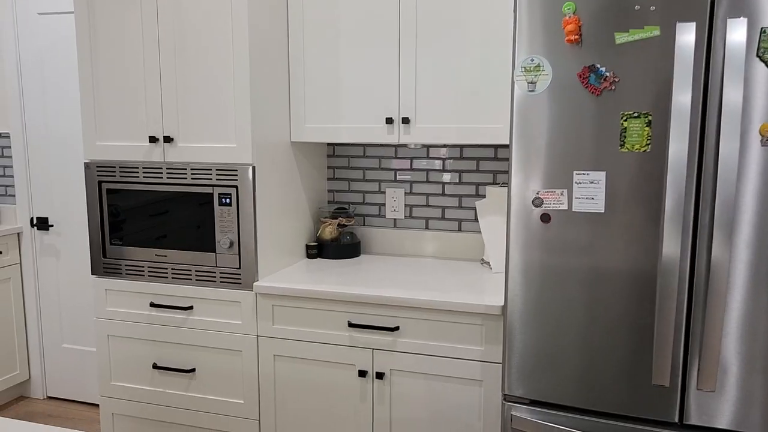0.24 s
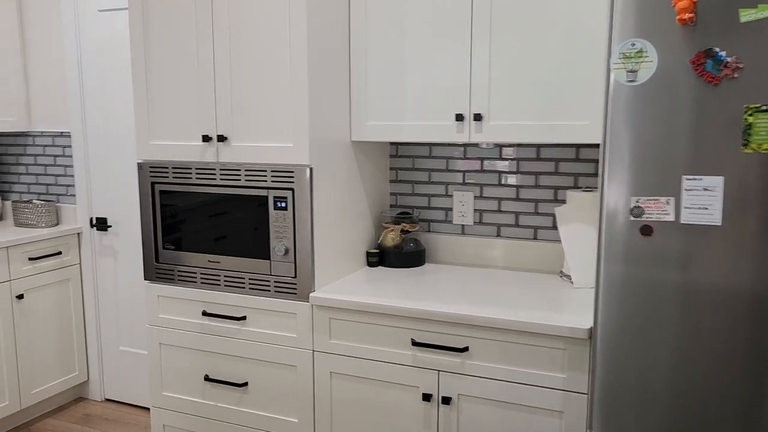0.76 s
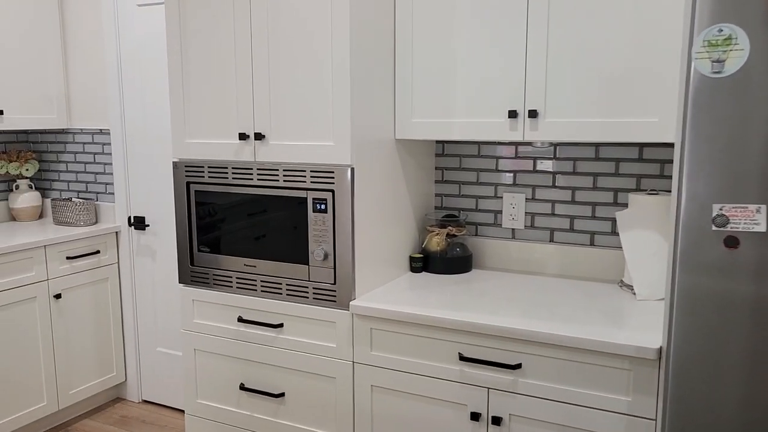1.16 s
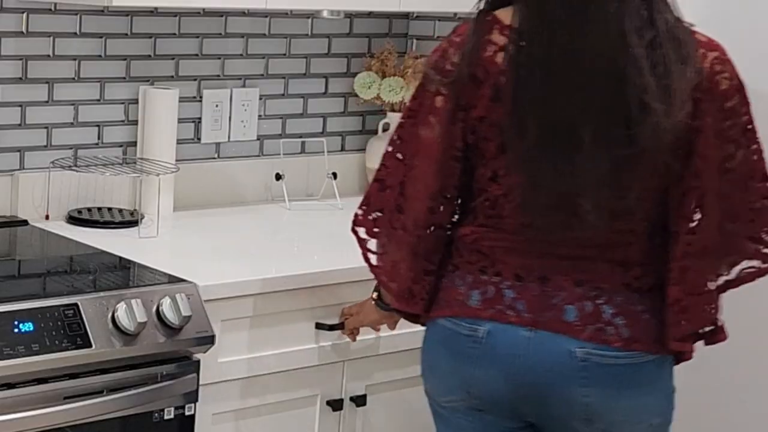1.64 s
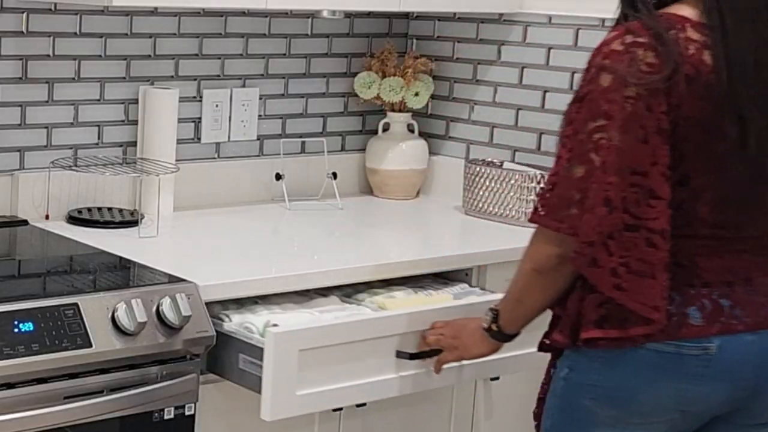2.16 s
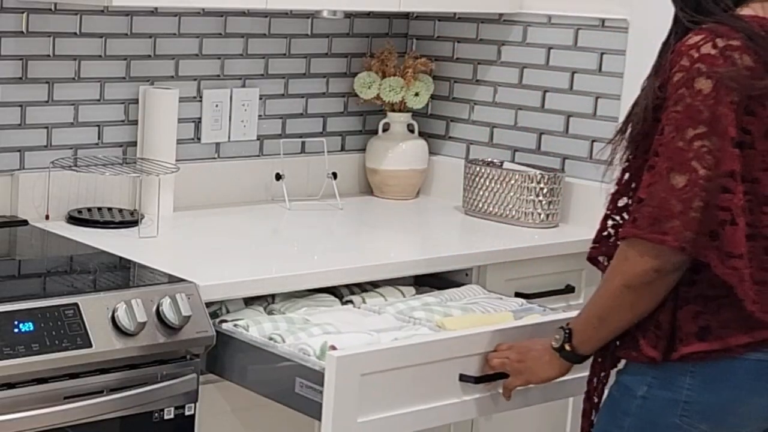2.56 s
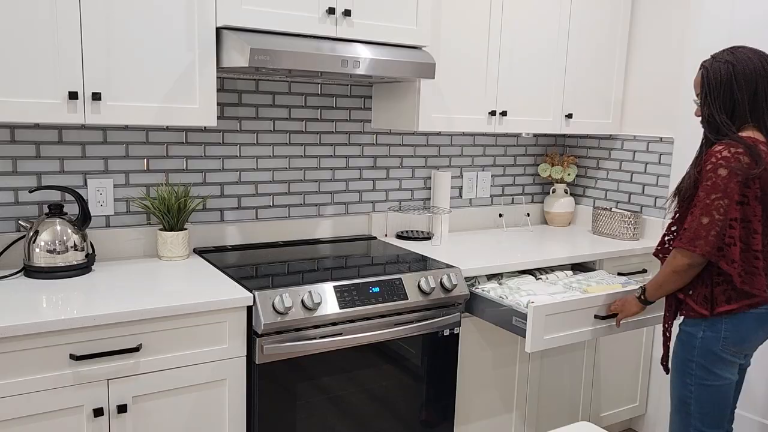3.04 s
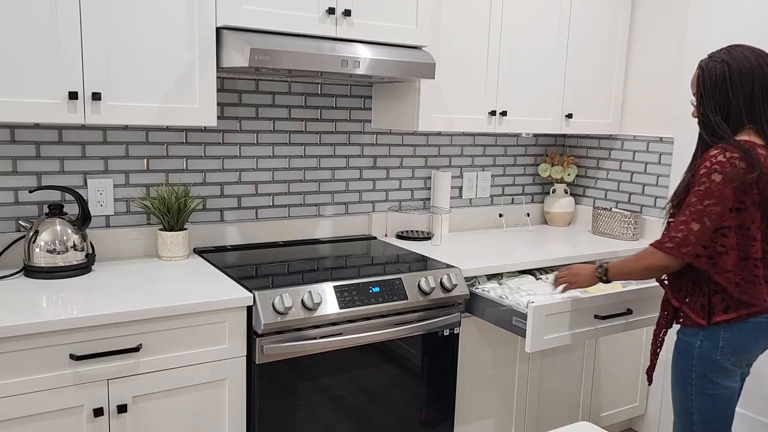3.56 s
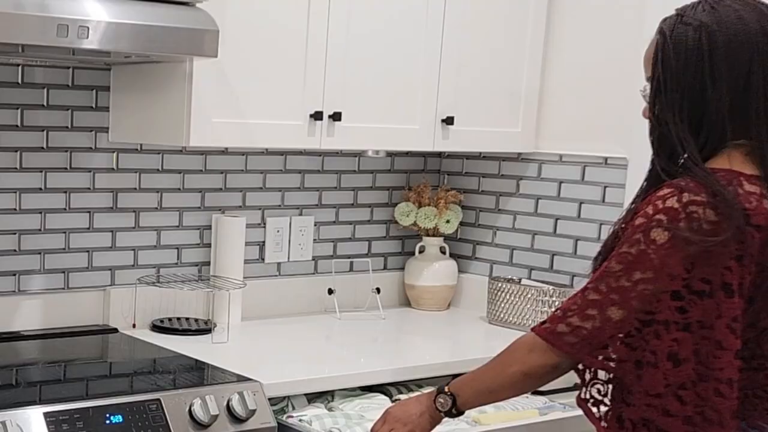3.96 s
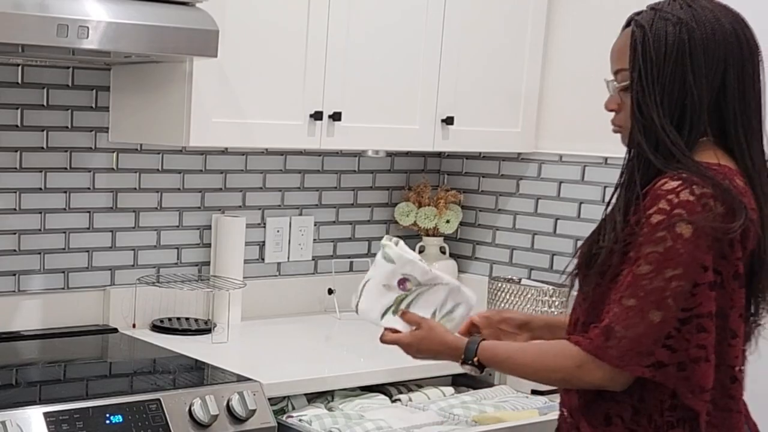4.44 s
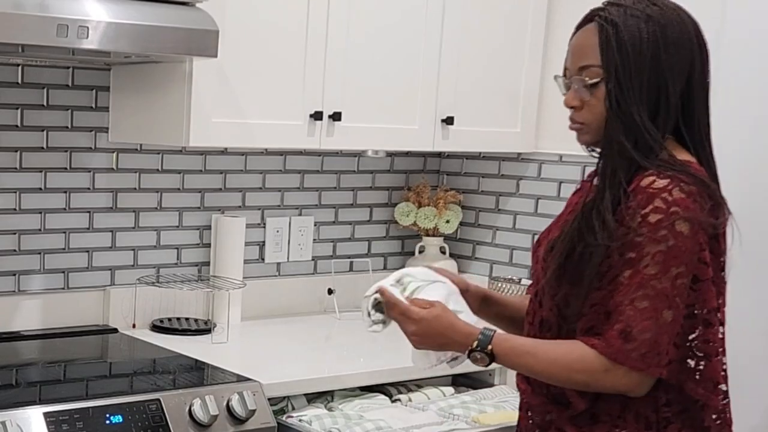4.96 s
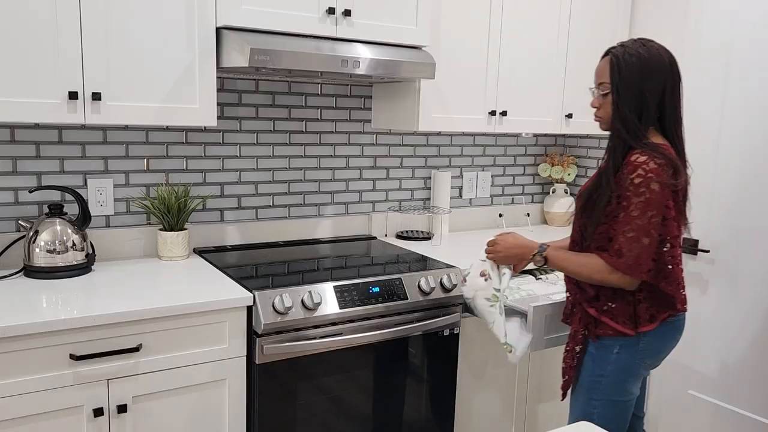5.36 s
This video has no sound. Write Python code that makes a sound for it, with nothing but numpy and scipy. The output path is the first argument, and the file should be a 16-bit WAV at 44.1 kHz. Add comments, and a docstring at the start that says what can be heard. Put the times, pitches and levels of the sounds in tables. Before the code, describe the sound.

In a hard-walled kitchen, a loud wooden thump is followed by a drawer sliding open with a boxy knock, then faint towel swishes.

```python
"""A hard-walled kitchen, heard from a few steps away, built from shaped noise and decaying modes.
Over refrigerator hum and fan air, a cabinet slides, judders, catches and thuds shut; its panels ring.
The hum then gives way to quiet room tone. A drawer rasps off its catch, rolls out on ball bearings,
bangs into its end stop with a boxy ring and rattling rails, and clacks as the hand lets go.
A towel is pulled out and shaken open: bands of grainy noise glide in pitch under fibre hiss."""
import sys
import numpy as np
from scipy import signal
from scipy.fft import rfft, irfft, next_fast_len
from scipy.io import wavfile
from scipy.ndimage import uniform_filter1d

SR = 44100
rng = np.random.default_rng(int(sys.argv[2]) if len(sys.argv) > 2 else 0)


def bounce(signal):
    """Save signal as a 16-bit WAV file at the path given by the first command-line argument."""
    frames = np.transpose(np.atleast_2d(signal))
    limited = np.clip(frames, -1, 1)
    pcm = np.round(limited * 32767).astype(np.int16)
    wavfile.write(sys.argv[1], SR, pcm)


N = 247070
TIME = np.arange(N) / SR
RING_TIME = np.arange(SR) / SR  # every blow is given one second to die away

# Cabinet contacts; hard ones clatter, soft ones thump the panels:
# (time [s], level before the hard/soft split [dB], hardness [0-1])
CABINET_KNOCKS = [(.782, -25, 0.9), (.792, -27, 0.94), (.803, -16.5, 0.07), (.817, -14.5, 0.24),
                  (.879, -26.5, 0.28)]
# Cabinet panel modes: (frequency [Hz], level [dB])
PANEL_MODES = [(60, 4), (102, 4), (122, -0.5), (187, 2), (213, -6), (334, -2.5), (377, 0)]
# Cabinet frame modes, rung by hard contacts: (frequency [Hz], level [dB])
FRAME_MODES = [(614, 2.5), (870, 0.5), (1020, -6), (1163, -11.5)]
# Colour of the cabinet's clatter: (frequency [Hz], gain [dB])
CABINET_WOOD = [(70, -36), (112, -5), (159, -22), (206, -10.5), (266, -17), (376, -17.5), (627, -16),
                (1020, -19), (1290, -26.5), (1670, -24.5), (2900, -37), (4200, -46), (15500, -71)]
# Resonances of the juddering wood, each passed twice: (frequency [Hz], width of one pass [Hz], level [dB])
JUDDER_BODY = [(130, 90, 2), (380, 73, 2), (620, 180, -7)]
# Drawer jolts:
# (time [s], clatter level [dB], brightness [dB/octave], box ring level [dB], rocking level [dB])
DRAWER_KNOCKS = [(2.666, -53.5, -9, -46, -52), (2.781, -29, 1.5, -22.5, -20.5), (3.08, -58.5, 1, -62, -64),
                 (3.517, -49.5, -6, -38.5, -35.5)]
# Drawer box modes: (frequency [Hz], level before brightness [dB])
BOX_MODES = [(97, -1), (126, 3), (184, -1), (226, -1.5), (356, 0.5), (382, 0), (415, 0), (463, -5),
             (552, -2), (651, -0.5), (698, -1.5), (764, -9.5)]
# The drawer's weight rocking on its slides: (frequency [Hz], level [dB], t60 [s])
ROCKING_MODES = [(27.7, -4.5, 0.96), (43.56, -4, 1), (53.6, -0.5, 0.63)]
# Colour of the drawer's clatter: (frequency [Hz], gain [dB])
DRAWER_WOOD = [(53, -11), (90, 5), (172, -7.5), (222, -6.5), (259, -10.5), (415, 1.5), (515, -5.5),
               (682, -3.5), (1120, -14.5), (1690, -16.5), (2710, -26), (5390, -25.5), (8120, -34),
               (12200, -34.5), (15500, -41)]
# Clacks of the steel slides: (time [s], level [dB], brightness [dB/octave])
CLACKS = [(2.787, -39.5, 9.5), (2.798, -36, -3), (3.088, -55, -4.5), (3.2, -56.5, -7), (3.488, -38, -0.5),
          (3.496, -33, 0), (3.524, -39.5, -5.5)]
# Slide rail modes: (frequency [Hz], level before brightness [dB])
RAIL_MODES = [(625, -1.5), (705, 1.5), (1385, 2), (1810, 2), (2216, 4), (2495, 4), (3128, -1)]
# Colour of the slides' rattle: (frequency [Hz], gain [dB])
SLIDE_STEEL = [(300, -11), (700, -6), (1400, -2), (2800, 0), (4500, -8), (7500, -20), (10000, -34),
               (15500, -61)]
# Resonances of the catch, each passed twice: (frequency [Hz], width of one pass [Hz], gain of one pass [dB])
CATCH_BODY = [(1510, 500, -0.61), (2660, 780, 0.5), (4680, 600, 0.71)]
# Drawer resonances shaken by the rolling: (frequency [Hz], width [Hz], gain [dB])
ROLL_BODY = [(294, 33, 3.5), (385, 47, 3), (472, 71, 1), (563, 135, -0.5), (710, 85, 3), (924, 355, -7),
             (1390, 850, -13), (2250, 650, -20.5)]
# Rough spots in the rails: (time [s], jolt against the steady rolling [dB])
ROLL_BUMPS = [(2.044, 1), (2.12, 0), (2.237, 0)]
# Carcass resonance, passed twice: (frequency [Hz], width of one pass [Hz], gain of one pass [dB])
CARCASS_BODY = [(107, 135, 0)]
# Towel swishes; a narrow one squeaks:
# (time [s], length [s], level [dB], starting pitch [Hz], ending pitch [Hz], half-width [octaves])
SWISHES = [(3.761, 0.053, -62, 850, 1100, 1), (3.905, 0.034, -56, 424, 450, 0.24),
           (4.249, 0.06, -58.5, 900, 1000, 1), (4.522, 0.19, -52, 826, 2910, 0.46),
           (4.928, 0.063, -62, 1220, 1250, .1), (5.356, 0.037, -61, 500, 480, 0.88)]
# Small hardware clicks: (time [s], level [dB])
CLICKS = [(.585, -42.5), (0.603, -39.5), (1.592, -45)]
# Plucks of the catch spring: (time [s], level in the left channel [dB])
TWANGS = [(.64, -51), (0.85, -46)]
# Catch spring modes: (frequency [Hz], level [dB])
SPRING_MODES = [(2186, 0), (6848, -5)]
# Colour of small hardware: (frequency [Hz], gain [dB])
HARDWARE_COLOUR = [(200, 5.5), (700, -2.5), (1800, -1), (3500, -7.5), (6000, -11), (10000, -18),
                   (15500, -19)]
# Short rubs of slides and sleeve: (time [s], length [s], level [dB], brightness [about dB/octave])
RUBS = [(0.462, 0.089, -51, -4), (0.614, 0.052, -45, -3.5), (0.716, 0.065, -42.5, -6.5),
        (0.804, 0.072, -40.5, -4.5), (0.811, 0.026, -55, 6), (1.586, 0.067, -52.5, -3),
        (1.756, 0.038, -42, -1), (1.875, 0.059, -42.5, -5.5), (3.231, 0.031, -51.5, 12.5),
        (3.278, 0.28, -63, 10), (4.248, 0.058, -60.5, 8), (4.911, 0.079, -60, 1.5)]
# Colour of rubbing: (frequency [Hz], gain [dB])
RUB_COLOUR = [(300, -0.5), (1200, 1), (2400, 2.5), (3500, -2.5), (5300, -1.5), (7500, -7), (10000, -11),
              (15500, -13.5)]
# Compressor and fan tones: (frequency [Hz], rms level [dB])
FRIDGE_HUM = [(59.2, -45.5), (107.7, -55.5), (296, -64.5), (360.6, -58), (539, -61), (651.2, -60.5)]
# Colour of the fan air: (frequency [Hz], gain [dB])
FRIDGE_AIR = [(25, -16.5), (57, -5.5), (80, -15), (112, -19.5), (175, -22), (289, -19.5), (322, -38),
              (359, -19.5), (582, -22.5), (700, -23), (1500, -41), (15500, -64)]
# Colour of the quiet room: (frequency [Hz], gain [dB])
ROOM_TONE = [(20, -2), (88, 2), (125, -8), (160, -13.5), (230, -11.5), (290, -18.5), (700, -20),
             (2000, -25), (8600, -33.5), (10500, -42), (15500, -37)]
# Reverberation of the kitchen: (frequency [Hz], t60 [s])
KITCHEN = [(100, 0.95), (400, 0.5), (1500, 0.52), (4000, 0.48), (8000, 0.43), (15000, 0.41)]
# Likeness of the two channels in diffuse sound: (frequency [Hz], correlation [0-1])
ALIKE = [(110, 0.94), (290, 0.84), (640, 0.45), (1400, 0.0039)]
# Channel balance: (frequency [Hz], left minus right [dB])
BALANCE = [(60, 0), (700, 1.54), (8000, 2.5), (13000, -2.5)]

# the cabinet gathers speed until it meets its frame
PUSH_S, SHUT_S, GLIDE_DB, GLIDE_GAIN_DB = 0.61, 0.78, -29.5, 13.5
SOFT_TILT_DB, HARD_TILT_DB = -6, -1  # brightness per octave of the softest and the hardest contact
# the cabinet judders as it nears the frame: starting slip rate, its climb and relative jitter
JUDDER_S, JUDDER_LENGTH_S, JUDDER_DB = .69, 0.0986, -29
JUDDER_HZ, JUDDER_OCTAVES_PER_S, JUDDER_JITTER = 116.7, 2.57, .06
# every drawer jolt bounces on: first gap, growth of the gaps, loss of level and of tilt per contact
BOUNCE_S, BOUNCE_GROWTH, BOUNCE_LOSS_DB, BOUNCE_DULL_DB = .021, 1.24, 1, 1.8
LEAD_S, LEAD_DB = 0.0085, -9  # the slides' play is taken up just before the blow
CATCH_S, CATCH_LENGTH_S, CATCH_DB = 1.685, 0.16, -52  # the catch drags before it lets go
# the drawer is pulled: it speeds up, then slows steadily until it stops
PULL_S, FASTEST_S, STOP_S = 1.91, 2.13, 2.815
ROLL_DB, ROLL_GAIN_DB, ROLL_LOSS_DB = -39.5, 6, 12.5  # level; speed gained on the way up; lost by the stop
RAIL_HISS_DB, CARCASS_DB = -60, -52  # rail hiss at full speed; carcass rumble while the drawer moves
BUMP_S, ROLL_BRIGHTENS = .008, .5  # decay of a jolt; how much more the high resonances depend on speed
CLOTH_GRIT_DB = 0.5  # cloth slides more smoothly than hardware
FIBRE_DB, FIBRE_GROWTH_DB = -8, 3.5  # hiss against a swish centred on 1 kHz; more per octave of pitch
# the towel rustles in small touches while it is handled
HANDLING_S, HANDLING_LENGTH_S, HANDLING_DB = 4.9, 1, -68.5
TOUCH_S, TOUCH_SPREAD_DB = .035, 3
MOVE_S = 1.59  # the listening place jumps from refrigerator to stove: only the background switches
TOP_HZ = 15800


def cabinet():
    """The cabinet rumbles home ever faster, knocks on its frame and thumps its panels."""
    out = np.zeros((2, N))
    for s, db, hardness in CABINET_KNOCKS:
        hard = np.clip(hardness, 0, 1)
        tilt_db = SOFT_TILT_DB + hard * (HARD_TILT_DB - SOFT_TILT_DB)
        knock = clatter(CABINET_WOOD, tilt_db, rise_s=0.00049, early=3.1, early_s=0.0038)
        frame = ring(FRAME_MODES, rise_s=0.0014, scatter_db=2.0, wander=3.3)
        thump = ring(PANEL_MODES, rise_s=0.0019, scatter_db=3.0, wander=6.6, damping=2.4)
        add(out, s, amp(db) * hard * knock)
        add(out, s, amp(db - 14.5) * hard * frame)
        add(out, s, amp(db) * (1 - hard) * thump)
    panels = [(hz, hz / 3, db) for hz, db in PANEL_MODES]
    rumble = unit(filtered(rng.standard_normal(N), lambda f: f * resonances(panels, f)))
    glide = amp(GLIDE_DB) * motion(PUSH_S, SHUT_S, SHUT_S, GLIDE_GAIN_DB, 0)
    muffled = filtered(glide * rumble, lambda f: 1 / (1 + (f / 800) ** 2))
    return out + in_kitchen(muffled, direct=0.58)


def judder():
    """Wood sticks and slips unevenly, ever faster and harder: a short rough groan just before the thud."""
    t = TIME[:round(JUDDER_LENGTH_S * SR)]
    jitter = JUDDER_JITTER * unit(uniform_filter1d(rng.standard_normal(len(t)), size=300))
    rate = JUDDER_HZ * 2 ** (JUDDER_OCTAVES_PER_S * t) * (1 + jitter)
    # one impulse for each completed cycle, of uneven strength
    slips = np.diff(np.floor(np.cumsum(rate) / SR), prepend=-1) * amp(3 * rng.standard_normal(len(t)))
    swelling = slips * (1 + 2 * t / JUDDER_LENGTH_S)

    def wood(f):
        return sum(amp(db) * resonances([(hz, w, 0)], f) ** 2 for hz, w, db in JUDDER_BODY)

    groan = unit(filtered(swelling, wood))
    fade = np.minimum(1, 10 * (1 - t / t[-1]))  # over the last tenth
    out = np.zeros((1, N))
    add(out, JUDDER_S, amp(JUDDER_DB) * groan * fade)
    return in_kitchen(out[0], direct=2.2)


def drawer_knocks():
    """Each jolt ticks, strikes and bounces: the box rings and its weight rocks on the extended slides."""
    out = np.zeros((2, N))

    def wood(tilt_db):
        return clatter(DRAWER_WOOD, tilt_db, rise_s=0.0025, early=1.0, early_s=0.058)

    for s, db, tilt_db, ring_db, rock_db in DRAWER_KNOCKS:
        add(out, s - LEAD_S, amp(db + LEAD_DB) * wood(tilt_db))
        add(out, s, amp(rock_db) * ring(ROCKING_MODES, rise_s=0.012, scatter_db=4, wander=1.7))
        modes = tilted(BOX_MODES, tilt_db / 2)
        for k, delay_s in enumerate(bounces(count=3)):
            box = amp(ring_db) * ring(modes, rise_s=0.005, scatter_db=0.0, wander=5.0, damping=2.04)
            strike = amp(db) * wood(tilt_db - k * BOUNCE_DULL_DB)
            add(out, s + delay_s, amp(-k * BOUNCE_LOSS_DB) * (strike + box))
    return out


def bounces(count):
    """Delays of the contacts of one jolt, each gap longer than the last."""
    gaps = BOUNCE_S * BOUNCE_GROWTH ** np.arange(count)
    return np.cumsum(gaps) - gaps


def slides():
    """The steel rails rattle in their play and ring briefly."""
    out = np.zeros((2, N))
    fade = np.exp(-(RING_TIME / 0.25) ** 2)  # the rattle settles as the parts come to rest
    for s, db, tilt_db in CLACKS:
        rattle = fade * clatter(SLIDE_STEEL, tilt_db, rise_s=0.0014, early=0.62, early_s=0.0029)
        modes = tilted(RAIL_MODES, tilt_db)
        rails = amp(-7.5) * ring(modes, rise_s=0.0012, scatter_db=3.0, wander=7.8, damping=1.44)
        add(out, s, amp(db) * (rattle + rails))
    return out


def drawer_run():
    """The catch rasps, then ball bearings roll, shake drawer box and carcass, and hiss along the rails."""
    catch = np.zeros((1, N))
    drag = stroke(CATCH_LENGTH_S)
    rasp = unit(filtered(drag, lambda f: sum(resonances([mode], f) ** 2 for mode in CATCH_BODY)))
    add(catch, CATCH_S, amp(CATCH_DB) * rasp)
    speed = motion(PULL_S, FASTEST_S, STOP_S, ROLL_GAIN_DB, ROLL_LOSS_DB)
    hiss = rub_colour(grit(N, spread_db=0.5, grain_s=0.0029), tilt_db=0.0)
    rumble = unit(filtered(rng.standard_normal(N), lambda f: resonances(CARCASS_BODY, f) ** 2))
    run = amp(ROLL_DB) * rolling(speed)
    run = run + amp(RAIL_HISS_DB) * speed * hiss
    run = run + amp(CARCASS_DB) * (speed > 0) * rumble
    return in_kitchen(catch[0] + run, direct=0.65)


def rolling(speed):
    """Bearings shake the drawer box; its resonances trade strength, the high ones fading first as it slows."""
    jolts = sum(amp(db) * np.exp(-np.abs(TIME - s) / BUMP_S) * (TIME >= s) for s, db in ROLL_BUMPS)
    drive = grit(N, spread_db=4.5, grain_s=.004) * (1 + jolts)

    def each_resonance(f):
        return np.array([(-1) ** k * resonances([mode], f) for k, mode in enumerate(ROLL_BODY)])

    parts = filtered(drive, each_resonance)
    shift = amp(2 * unit(uniform_filter1d(rng.standard_normal(parts.shape), size=3000)))
    hz = np.array(ROLL_BODY)[:, :1]
    follow = speed ** ((hz / np.median(hz)) ** ROLL_BRIGHTENS)
    return (parts * shift * follow).sum(0) / parts.sum(0).std()


def motion(start_s, fastest_s, stop_s, gain_db, loss_db):
    """Speed of a sliding part against its fastest: it gains speed, is braked steadily, and stops dead."""
    speeds = [amp(-gain_db), 1, amp(-loss_db)]
    return np.interp(TIME, [start_s, fastest_s, stop_s], speeds, left=0, right=0)


def towel():
    """Cloth slides over cloth: higher swishes carry more fibre hiss, and small touches rustle."""
    out = np.zeros((1, N))
    for s, length_s, db, first_hz, last_hz, width_octaves in SWISHES:
        hz, t, z = signal.stft(stroke(length_s, spread_db=CLOTH_GRIT_DB), SR, nperseg=512)
        # the pitch glides smoothly, following the speed of the passing weave
        centre = first_hz * (last_hz / first_hz) ** (np.sin(np.pi / 2 * t / t[-1]) ** 2)
        band = (1 + (np.log2((hz[:, None] + 1) / centre) / width_octaves) ** 2) ** -2
        swish = unit(signal.istft(z * band / np.linalg.norm(band, axis=0), SR)[1])
        octaves = np.log2(centre.mean() / 1000)
        fibres = rub_colour(stroke(length_s), tilt_db=0.0)
        add(out, s, amp(db) * swish)
        add(out, s, amp(db + FIBRE_DB + FIBRE_GROWTH_DB * octaves) * fibres)
    touches = grit(round(HANDLING_LENGTH_S * SR), spread_db=TOUCH_SPREAD_DB, grain_s=TOUCH_S)
    add(out, HANDLING_S, amp(HANDLING_DB) * rub_colour(touches, tilt_db=3.0))
    return in_kitchen(out[0], direct=0.88)


def hardware():
    """Catches and handles click; a small spring sings on."""
    out = np.zeros((2, N))
    for s, db in CLICKS:
        click = clatter(HARDWARE_COLOUR, tilt_db=-1, rise_s=0.0012, early=1.56, early_s=0.004)
        add(out, s, amp(db) * click)
    for s, db in TWANGS:
        twang = ring(SPRING_MODES, rise_s=.015, scatter_db=1, wander=3, damping=1.6)
        add(out, s, amp(db) * twang * amp([[0], [-6]]))  # leans to the left
    return out


def rubbing():
    """Fine friction of slides and fabric."""
    out = np.zeros((1, N))
    for s, length_s, db, tilt_db in RUBS:
        add(out, s, amp(db) * rub_colour(stroke(length_s), tilt_db))
    return in_kitchen(out[0], direct=0.26)


def background():
    """Refrigerator hum (steady sines) and fan air at the first place, quiet room tone at the second."""
    hum = 0
    for hz, db in FRIDGE_HUM:
        hum = hum + amp(db) * np.sqrt(2) * np.sin(2 * np.pi * (hz * TIME + rng.random()))
    fan = amp(-45.5) * diffuse(N, lambda f: amp(along(FRIDGE_AIR, f)))
    tone = amp(-53.5) * diffuse(N, lambda f: amp(along(ROOM_TONE, f)))
    moved = np.clip((TIME - MOVE_S) / 0.0033, 0, 1)
    return (1 - moved) * (hum + fan) + moved * tone


def clatter(spectrum, tilt_db, rise_s, early, early_s):
    """One contact: a cluster of strong first reflections melts into the room's tail."""
    t = RING_TIME

    def colour(f):
        return amp(along(spectrum, f) + tilt_db * np.log2(np.maximum(f, 200) / 1000))

    noise = diffuse(SR, colour)
    near = np.exp(-t / early_s)
    flutter = unit(np.convolve(rng.standard_normal(SR), np.hanning(90), "same"))
    echoes = amp(1.5 * near * flutter)
    return die_away(noise) * (1 - np.exp(-t / rise_s)) * (1 + early * near) * echoes


def ring(modes, rise_s, scatter_db, wander, damping=1):
    """Damped modes at new strengths for each blow, their phases drifting in the room."""
    t = RING_TIME
    hz, db, *own = np.transpose(modes)[:, :, None]
    # without a t60 column, a mode dies "damping" times as fast as the room
    t60 = own[0] if own else along(KITCHEN, hz) / damping
    gain = amp(db + scatter_db * rng.standard_normal(db.shape))
    drift = wander * np.cumsum(rng.standard_normal((len(modes), SR)), axis=1) / np.sqrt(SR)
    phase = 2 * np.pi * hz * t + uniform_filter1d(drift, size=600, axis=1)
    waves = gain * np.sin(phase) * np.exp(-np.log(1000) * t / t60)
    waves[1::2] *= -1  # neighbouring modes swing in opposite senses
    return waves.sum(0) / np.linalg.norm(gain) * np.sqrt(2) * (1 - np.exp(-t / rise_s))


def tilted(modes, tilt_db):
    """A harder contact favours the high modes, a softer one the low."""
    return [(hz, db + tilt_db * np.log2(hz)) for hz, db in modes]


def grit(size, spread_db, grain_s):
    """Friction: noise broken into tiny slips of uneven strength, rms 1."""
    knots = np.arange(0, size / SR + grain_s, grain_s)
    noise = rng.standard_normal(size)
    strength = np.interp(TIME[:size], knots, rng.standard_normal(len(knots)))
    return unit(noise * amp(spread_db * strength))


def stroke(length_s, spread_db=2.5):
    """One stroke of grainy friction that swells and fades."""
    size = round(length_s * SR)
    return grit(size, spread_db, grain_s=0.0028) * np.sqrt(np.sin(np.pi * np.arange(size) / size))


def rub_colour(x, tilt_db):
    """Friction given the colour of rubbing, tilted towards the treble or bass, rms 1."""
    return unit(filtered(x, lambda f: amp(along(RUB_COLOUR, f) + tilt_db * np.log2(1 + f / 500))))


def resonances(body, f):
    """Causal response of (frequency [Hz], width [Hz], gain [dB]) resonances, alternating in sign."""
    total = 0
    for k, (c, w, db) in enumerate(body):
        total = total + (-1) ** k * amp(db) * 1j * f * w / (c * c - f * f + 1j * f * w)
    return total


def diffuse(size, colour):
    """Stereo noise from all sides, rms 1: bass nearly alike in both channels, treble unrelated."""
    def mid_side(f):
        turn = np.arccos(np.clip(along(ALIKE, f), -1, 1)) / 2
        return colour(f) * np.array([np.cos(turn), np.sin(turn)])

    mid, side = filtered(rng.standard_normal((2, size)), mid_side)
    return unit(np.array([mid + side, mid - side]))


def die_away(x):
    """Each frequency fades at the kitchen's own rate."""
    hz, t, z = signal.stft(x, SR, nperseg=256)
    faded = z * amp(-60 * t / along(KITCHEN, hz)[:, None])
    return signal.istft(faded, SR, nperseg=256)[1][:, :SR]


def in_kitchen(x, direct):
    """A distant source: direct sound and reflected sound in the ratio direct to 1, at about x's level."""
    tail = die_away(diffuse(SR, np.ones_like))
    wet = signal.fftconvolve(x[None], tail / np.linalg.norm(tail[0]), axes=1)[:, :N]
    return (wet + direct * x) / np.hypot(1, direct)


def amp(db):
    """Decibels to gain."""
    return 10 ** (np.asarray(db) / 20)


def unit(x):
    """Scale to rms 1."""
    return x / np.sqrt(np.mean(x ** 2) + 1e-20)


def along(points, hz):
    """(frequency [Hz], value) points read on a log frequency axis."""
    f, v = np.transpose(points)
    return np.interp(np.log(hz + 1), np.log(f + 1), v)


def filtered(x, response):
    """x times a response of frequency."""
    n = x.shape[-1]
    m = next_fast_len(n + SR // 4)
    return irfft(rfft(x, m) * response(np.fft.rfftfreq(m, 1 / SR)), m)[..., :n]


def add(track, s, sound):
    """Mix a sound in at time s, cut at the track's end."""
    part = track[:, round(s * SR):][:, :sound.shape[-1]]
    part += sound[..., :part.shape[-1]]


def scene():
    """Everything that sounds in the kitchen."""
    furniture = cabinet() + judder() + drawer_knocks() + slides() + hardware() + drawer_run()
    return furniture + rubbing() + towel() + background()


def record(dry):
    """Two slightly unequal microphone ports and a steep band limit."""
    def ports(f):
        return amp(np.array([[1], [-1]]) * along(BALANCE, f) / 2) * (f < TOP_HZ)

    return filtered(dry, ports)


dry = scene()
out = record(dry)
bounce(out)
```